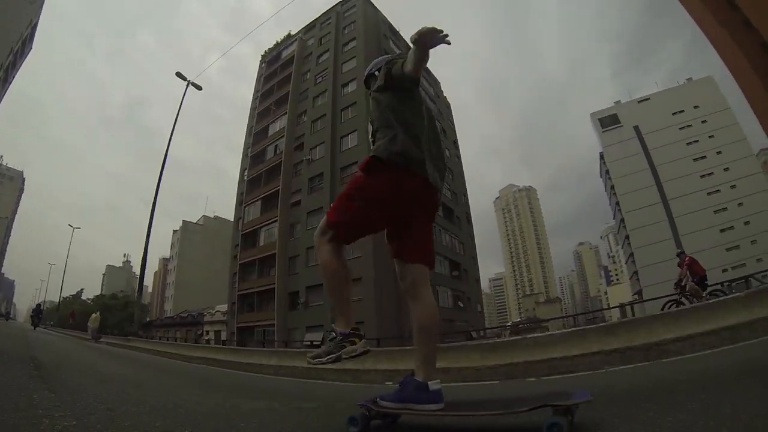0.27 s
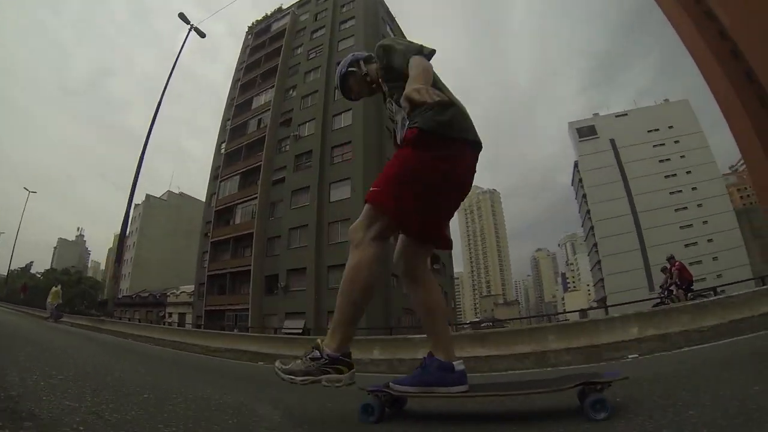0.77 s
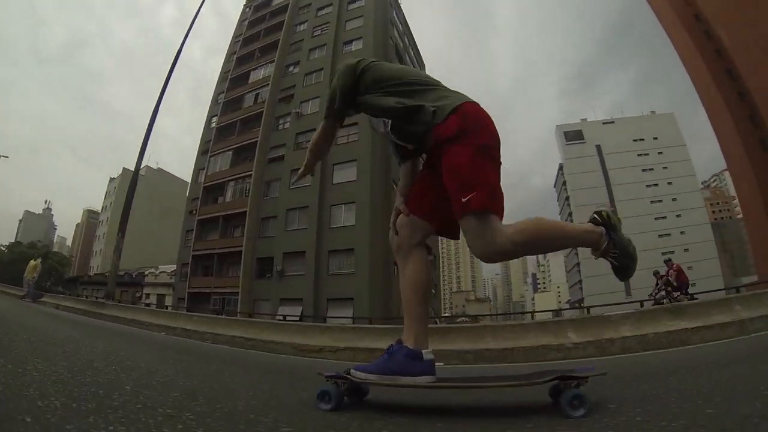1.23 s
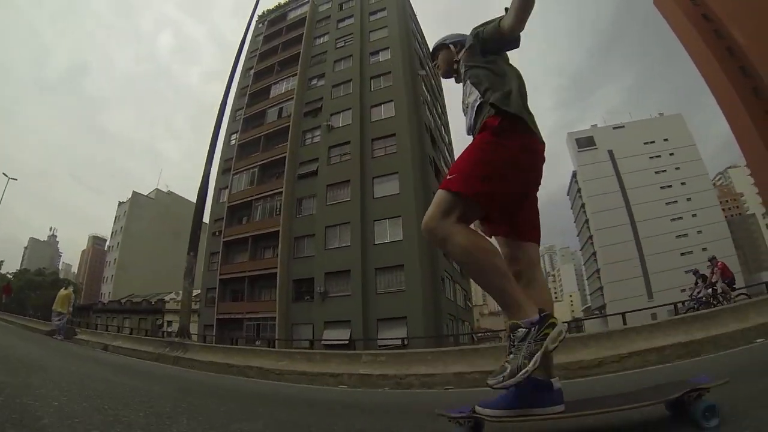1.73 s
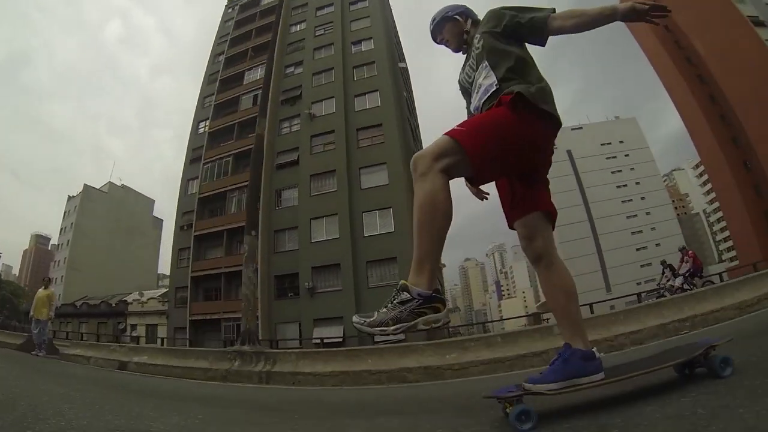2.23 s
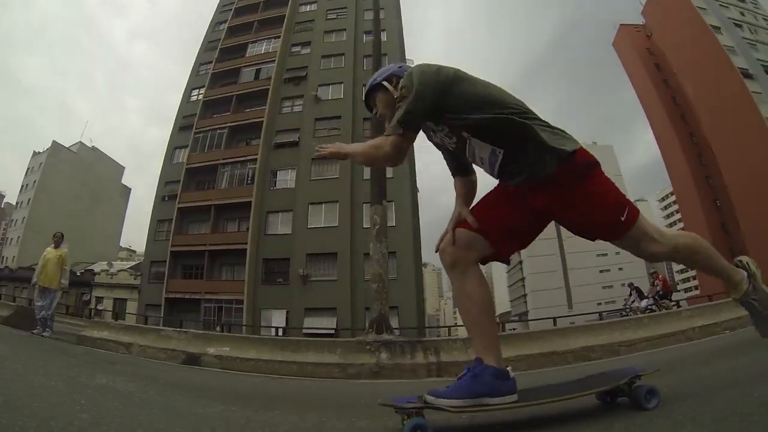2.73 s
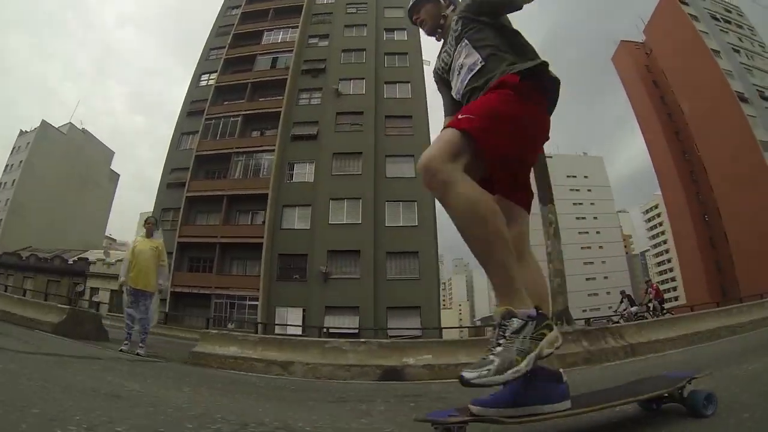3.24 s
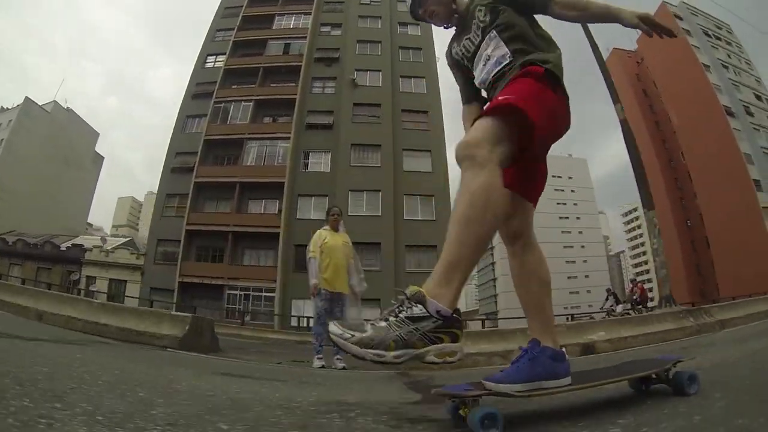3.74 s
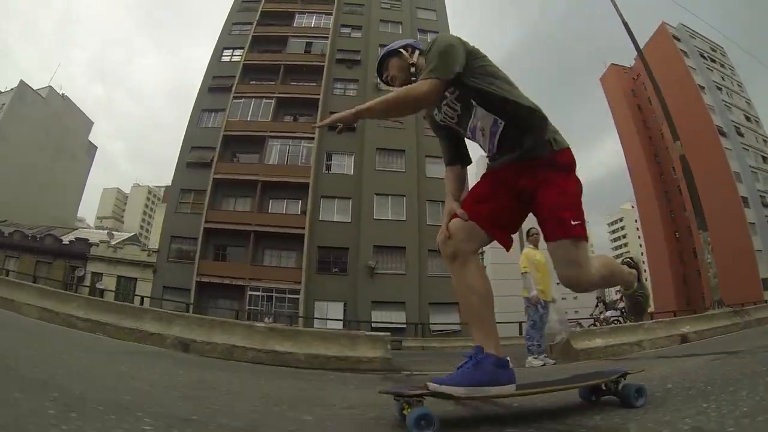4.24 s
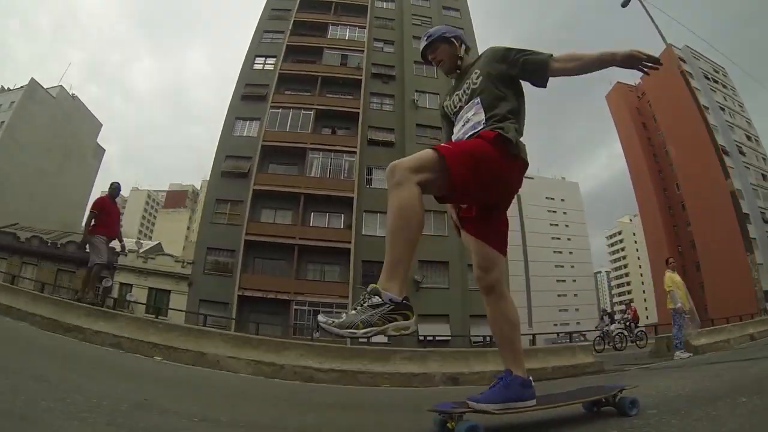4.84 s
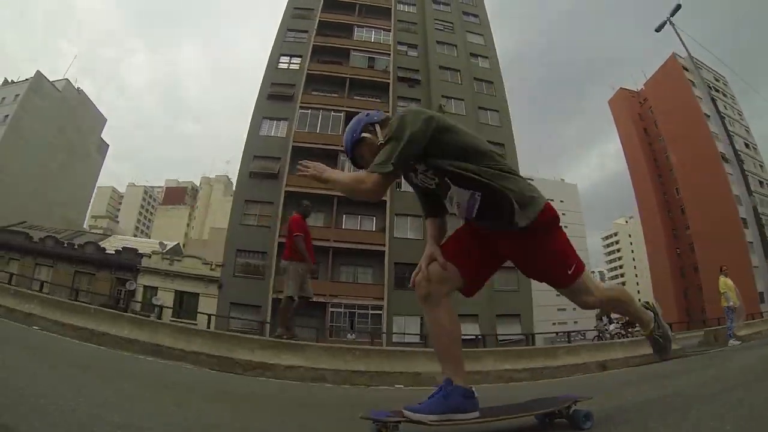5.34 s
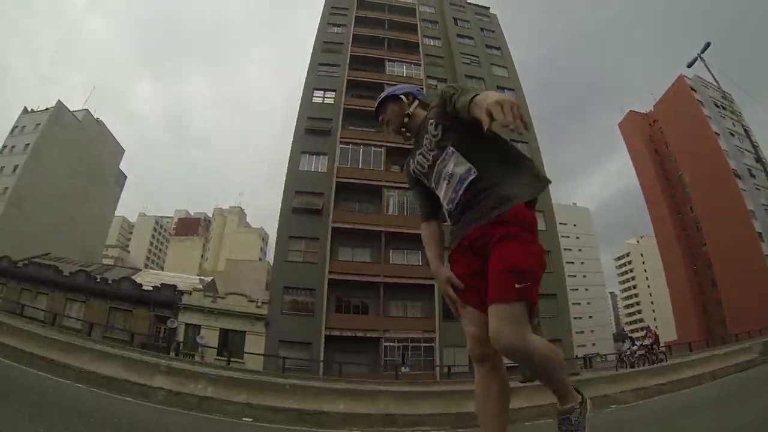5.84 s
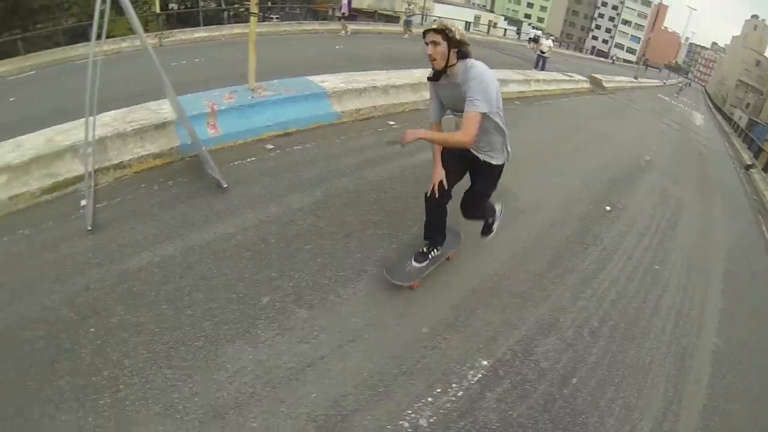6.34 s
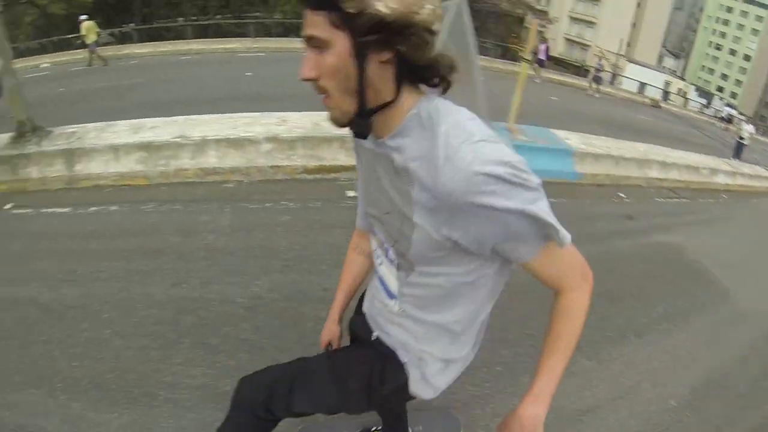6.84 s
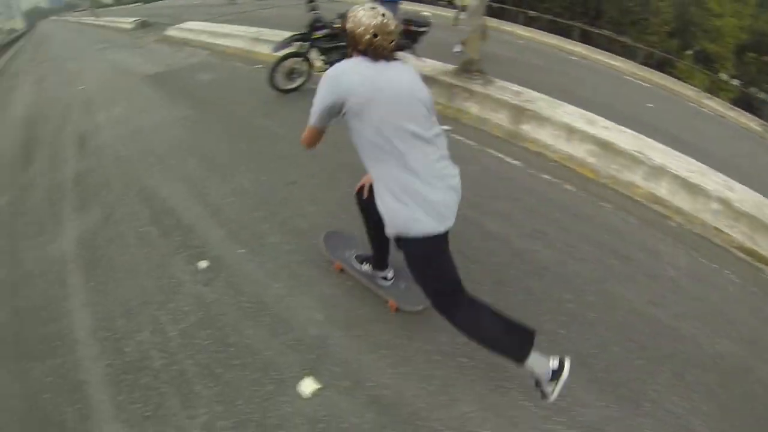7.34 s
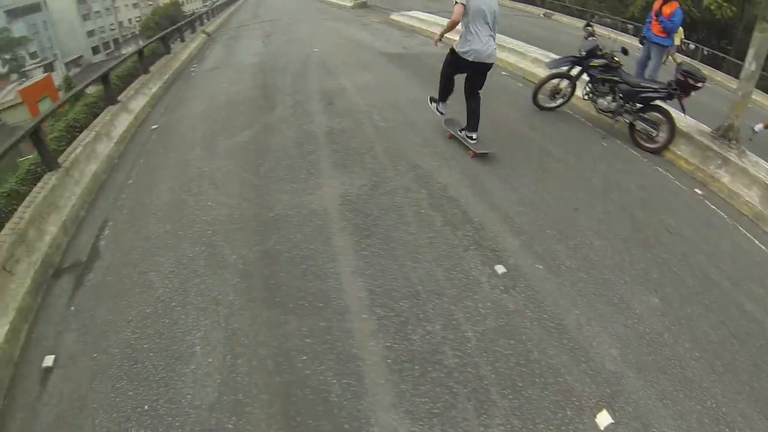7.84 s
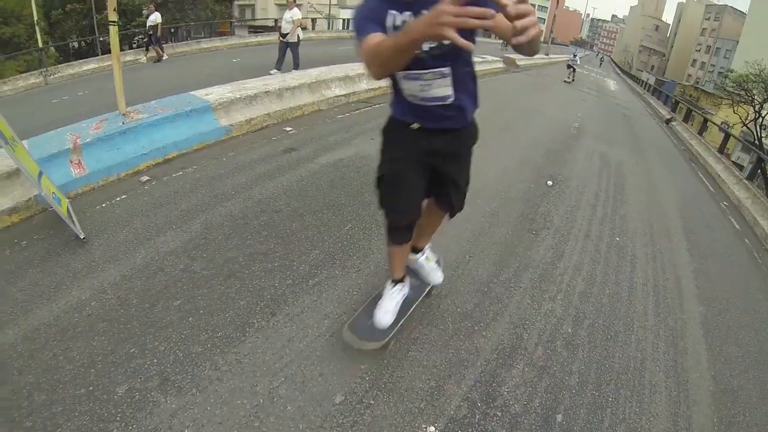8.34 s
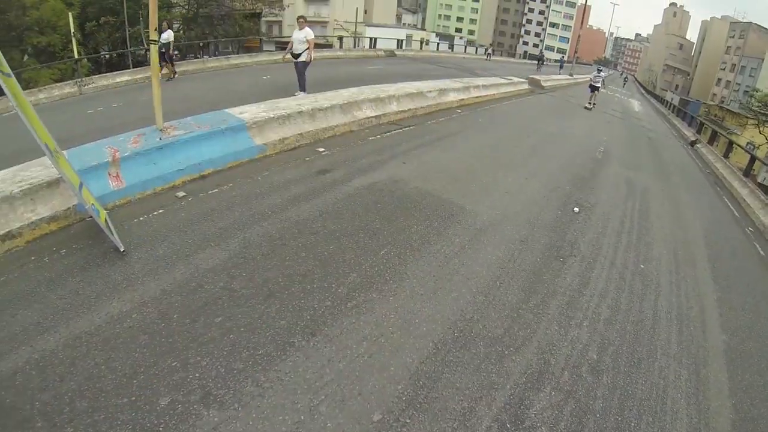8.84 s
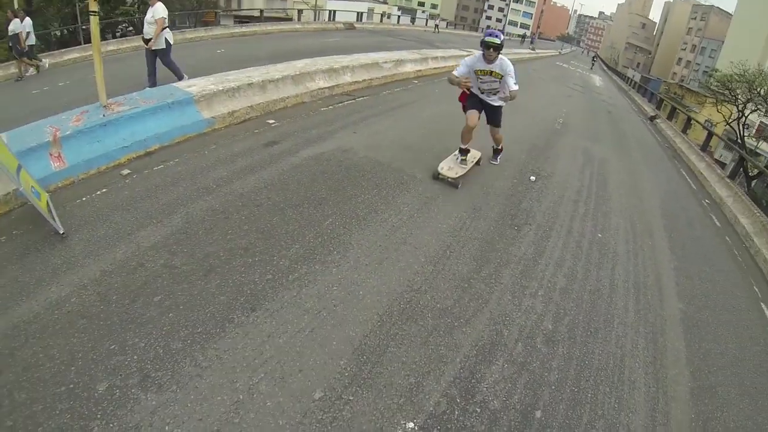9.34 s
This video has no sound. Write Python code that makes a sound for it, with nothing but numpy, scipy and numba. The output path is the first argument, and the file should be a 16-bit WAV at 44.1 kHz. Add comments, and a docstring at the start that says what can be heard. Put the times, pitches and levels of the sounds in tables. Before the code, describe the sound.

From 0 to about 6 seconds, a microphone in a sealed camera housing travels beside a longboard on rough city asphalt. The mounting pole gives a strong, low, wavering hum, swelling over bumps and briefly dipping, with a noticeable jolt near 0.6. Wind pushes in slow deep buffets. Muffled wheel grit hisses and the deck rumbles unevenly, with small stone ticks near 3.4 and 4.7. Around 6.3 the hum and near roll fade into a roadside view. Gusts flutter, and a board passes very close with heavy wooden knocks from 6.6 to 6.8, then rolls away around 7.2 with light rattles. Another dull swell comes at 8.1, and a knocking, rattling pass at 8.4 to 8.6. Wind drops to near quiet around 9, with small jolts, before a last soft roll at 9.4. Faint hiss and thin electronic whine persist throughout.

```python
"""At first we ride beside a longboard on rough asphalt, a small camera in a sealed housing on a pole: the
pole hums in three wavering bending modes, wheel grit hisses through the housing, wind buffets it.
From about 6 s a cross-fade leads to the roadside, where gusts flutter and the wind dies down while other
boards roll past as swells of duller noise and droning decks, and knock over cracks as decaying modes.
The camera's own faint hiss and whines, made of filtered noise, last throughout."""
import sys
import numpy as np
from scipy import signal
from scipy.fft import rfft, irfft, next_fast_len
from scipy.io import wavfile
from scipy.ndimage import uniform_filter1d
from numba import njit

SR = 44100
rng = np.random.default_rng(int(sys.argv[2]) if len(sys.argv) > 2 else 0)


def persist_wave(psi):
    """Save psi, clipped to +-1, as 16-bit WAV."""
    counts = np.round(np.clip(psi, -1, 1) * 32767).astype(np.int16)
    wavfile.write(sys.argv[1], SR, np.atleast_2d(counts).T)


N = 423345
T = np.arange(N) / SR
HZ = np.maximum(np.fft.rfftfreq(next_fast_len(N), 1 / SR), 1)  # bins of every filter, kept above 0 for logs

# Spectrum of the camera's own hiss: (frequency [Hz], level [dB per Hz])
HISS_SPECTRUM = [(150, -5), (500, -21.5), (1000, -21.5), (2500, -24), (3500, -33), (4400, -37.5),
                 (5600, -31.5), (7900, -41), (8600, -36), (10000, -38.5), (12000, -43), (16000, -47)]
# Thin whines of the camera's electronics: (frequency [Hz], width [Hz], level [dB])
WHINES = [(5040, 170, 0), (8640, 300, -11), (9900, 200, -13)]
HISS_DB, WHINE_DB = -56.5, -73.5

# First bending mode of the pole, bent by the grip: (time [s], pitch [Hz], level [dB])
POLE_LOW = [(0.0, 54.6, -27.5), (0.4, 53.76, -22.5), (0.59, 65.9, -18.5), (0.83, 67.64, -16.5),
            (0.96, 63.3, -14.5), (1.52, 66.45, -17.5), (2.09, 66.9, -21.5), (2.33, 60.63, -12.5),
            (2.44, 67.9, -17.5), (2.76, 62.9, -16), (3.03, 73.17, -17), (3.22, 70.2, -15),
            (3.4, 73.82, -15), (4.0, 71.8, -24), (4.1, 79.34, -21), (4.7, 70.9, -15), (4.87, 70.36, -18.5),
            (5.02, 60.43, -20.5), (5.18, 59.16, -16.5), (5.39, 71.84, -17.5), (5.53, 65.06, -19.5),
            (6.14, 63.6, -22.5), (6.36, 66.8, -18), (6.45, 55.3, -23), (6.6, 59.5, -34)]
# Brief changes of the low hum, nearly all dips: (time [s], depth [dB], half length [s])
LULLS = [(0.435, 21, 0.032), (0.662, 24, 0.03), (0.767, 17, 0.039), (0.988, 15.5, 0.044),
         (2.273, 13.5, 0.063), (2.463, 16, 0.025), (2.68, 16, 0.039), (3.002, 11, 0.019), (3.46, 17, 0.05),
         (3.851, 4.5, 0.13), (4.19, -0.5, 0.039), (4.562, 19, 0.042), (5.037, 5, 0.037), (5.219, 8, 0.029),
         (5.6, 2, 0.075), (5.841, 8, 0.038), (6.198, 13, 0.059), (6.381, 12, 0.024)]
# Road bumps that set the upper modes swinging:
# (time [s], second mode pitch [Hz], second mode peak [dB], third mode peak [dB])
BUMPS = [(0.12, 101.1, -31, -43), (0.319, 97, -29.5, -46), (0.588, 107.1, -28, -39),
         (0.74, 102.1, -39, -40.5), (1.08, 98.6, -32.5, -42), (1.32, 106.2, -30, -52),
         (1.45, 101.1, -24, -44), (1.65, 103.2, -25.5, -46.5), (1.87, 112.3, -29.5, -38),
         (2.15, 94.9, -29.5, -45), (2.35, 113.8, -29, -37.5), (2.55, 105.9, -21.5, -37.5),
         (2.77, 96.47, -26, -52), (3.098, 109.2, -23.5, -56), (3.29, 106.4, -33, -56),
         (3.55, 104.3, -25, -44.5), (3.7, 103.7, -25, -54), (3.94, 106, -22, -50), (4.07, 115.2, -25, -48),
         (4.3, 108.9, -27, -43), (4.61, 103, -24.5, -48), (4.91, 101.5, -24, -49),
         (5.181, 102.1, -22.5, -43.5), (5.38, 105.2, -24.5, -43.5), (5.72, 97.05, -22.5, -41.5),
         (5.95, 95, -32.5, -40), (6.09, 96, -34.5, -61), (6.27, 100.8, -22.5, -51)]
# Random shaking around the second mode: (frequency [Hz], width [Hz], level [dB])
POLE_SHAKE = [(100.6, 23.8, 1.5), (120, 7.6, -13), (142, 122, -21.5)]
# Jolts of the pole over cracks: (time [s], peak [dB])
JOLTS = [(0.614, -20), (1.014, -42), (1.479, -33), (2.418, -34), (3.044, -33), (3.598, -35), (4.149, -39),
         (4.709, -31), (8.74, -31.5), (9.017, -34), (9.2, -47), (9.29, -47)]
# Modes rung by a jolt: (frequency [Hz], level [dB], 60 dB decay time [s])
JOLT_MODES = [(168, 0, 0.18), (240, 1.5, 0.088), (323, 5, 0.085), (466, -2, 0.072), (750, -8.5, 0.04)]
BUMP_RISE_S, BUMP_FALL_S = 0.083, 0.084
MID_REST_DB, HIGH_REST_DB = -39, -56  # second and third mode between bumps
SHAKE_DB = -5.5  # relative to the second mode
LOW_SHAKE_HZ, LOW_SHAKE_WIDTH_HZ = 71.1, 25.6
LOW_SHAKE_DB = -10  # relative to the first mode
POLE_HIGH_HZ, POLE_HIGH_WIDTH_HZ = 185.7, 13  # third mode

# Wind buffets on the housing: (time [s], level [dB])
WIND = [(0.0, -16.5), (0.45, -17), (1.15, -22), (1.3, -27), (1.76, -21), (1.9, -18), (2.35, -18),
        (2.78, -25.5), (3.0, -30), (3.69, -21.5), (4.84, -19.5), (6.0, -21), (7.1, -19.5), (7.75, -19),
        (7.9, -23), (8.6, -29.5), (9.6, -25)]
# Spectrum of the slow buffets: (frequency [Hz], level [dB per Hz])
BUFFET = [(12, -2), (20, 14.5), (27, -11), (36, 0.5), (46, 2.5), (60, -16.5), (90, -65)]
# Steady flutter at the roadside: (time [s], level [dB])
FLUTTER_LEVEL = [(6.2, -24), (7.0, -28.5), (7.75, -26), (7.95, -28), (8.3, -34.5), (8.65, -38.5),
                 (9.0, -43.5), (9.6, -30)]
# Spectrum of flutter and gusts: (frequency [Hz], level [dB per Hz])
FLUTTER = [(38, -7), (52, 9.5), (70, -1), (83, -3), (102, 0), (125, -14.5), (150, -28.5), (180, -29),
           (202, -13.5), (225, -30.5), (300, -31)]
# Gusts that strike the housing: (time [s], peak [dB])
GUSTS = [(6.3, -22), (6.44, -22), (6.58, -24), (6.83, -15.5), (7.24, -38), (7.451, -18.5), (7.7, -22),
         (8.74, -30), (9.03, -31.5), (9.2, -38), (9.421, -31)]
BUFFET_WAVER_DB = 1.5
GUST_RISE_S, GUST_FALL_S = 0.0085, 0.021

# The board alongside, over rougher and smoother stretches: (time [s], grit level [dB])
ROLL = [(0.0, -35), (0.15, -37), (0.32, -37.5), (0.36, -42.5), (0.41, -38.5), (0.603, -38.5), (0.61, -47.5),
        (0.67, -42), (0.78, -40.5), (0.9, -45.5), (1.07, -42), (1.31, -45), (1.43, -37.5), (1.5, -44.5),
        (1.86, -42), (1.89, -49), (2.2, -38), (2.44, -45), (2.5, -41.5), (2.64, -49.5), (2.74, -41.5),
        (2.85, -51.5), (3.03, -43), (3.42, -45), (3.51, -38.5), (3.65, -42.5), (3.87, -40), (3.95, -46),
        (4.1, -43), (4.66, -43), (4.76, -46), (4.9, -41.5), (5.24, -41.5), (5.32, -44), (5.5, -41.5),
        (6.1, -41.5), (6.38, -49.5), (6.52, -50), (6.75, -65)]
# Resonances of the housing: (frequency [Hz], width [Hz], level [dB])
HOUSING = [(1250, 110, -12), (1350, 90, -4), (1450, 110, 1.5), (1555, 110, -4), (1670, 80, -5),
           (1820, 130, -5), (2110, 200, -12), (2300, 300, -10.5), (2750, 300, -21), (3010, 150, -13),
           (3170, 160, -15), (3150, 600, -14), (3400, 170, -17), (3980, 170, -14.5), (4230, 400, -23),
           (4710, 100, -18), (5070, 280, -20), (5440, 340, -22), (6350, 300, -30), (6760, 420, -24.5),
           (7540, 910, -36), (9400, 1300, -38)]
# Broad response under the housing resonances: (frequency [Hz], level [dB])
NEAR_BED = [(600, -18), (1200, -15), (2600, -30), (4400, -23), (6100, -31), (8300, -43), (11000, -41),
            (15000, -60)]
# Spectrum of the near deck's rumble: (frequency [Hz], level [dB per Hz])
DECK = [(100, -6), (140, 8.5), (220, -2), (340, -1), (480, -5), (620, -10.5), (850, -11.5), (1100, -17.5),
        (1500, -23), (2500, -57.5)]
# Single stones ticking under the wheels: (time [s], level [dB])
TICKS = [(0.94, -39), (1.164, -43), (2.4185, -47), (2.767, -43.5), (2.893, -42.5), (3.36, -38),
         (3.5095, -49), (4.6585, -35), (5.175, -43), (5.8233, -42.5)]
# Response that colours stone ticks and knock clicks: (frequency [Hz], level [dB])
CLICK_HIGH = [(1500, -22.5), (2200, 9), (4800, -4), (5400, -19.5), (8000, -36), (11000, -45.5)]
DECK_DB = -46.5  # rumble level at the median grit level
DECK_FOLLOWS = 0.34  # dB of rumble for each dB of grit

# Time span of the roadside, one row for each end: (time [s],)
ROADSIDE_SPAN = [(6.3,), (9.6,)]
# Swells of boards rolling past: (loudest moment [s], approach [s], leaving [s], grit level [dB],
# deck drone level [dB], drone centre [Hz], rumble level [dB])
PASSES = [(6.58, 0.07, 0.098, -58, -42, 460, -43), (6.73, 0.11, 0.082, -51.5, -39.5, 517, -42),
          (6.9, 0.06, 0.19, -58, -41.5, 575, -46), (7.22, 0.2, 0.14, -48, -47, 554, -41.5),
          (8.07, 0.038, 0.18, -47, -73, 463, -56), (8.55, 0.16, 0.16, -47, -48.5, 593, -42.5),
          (9.4, 0.047, 0.17, -49, -63, 480, -61)]
# Resonances of the roadside grit: (frequency [Hz], width [Hz], level [dB])
ROADSIDE = [(736, 140, -3), (1270, 200, -4), (1470, 235, 3.5), (1645, 130, -5), (1990, 700, -13)]
# Broad response under the roadside resonances: (frequency [Hz], level [dB])
FAR_BED = [(300, -16.5), (1000, -22), (2600, -30), (4200, -39), (7000, -36), (15000, -60)]
# Spectrum of the passing rumble: (frequency [Hz], level [dB per Hz])
RUMBLE = [(120, -24), (200, 2), (350, 6.5), (600, -5), (850, -3.5), (1100, -6), (2500, -42)]
# Thin swish of bearings: (time [s], level [dB])
SWISH = [(6.3, -72), (6.6, -71.5), (7.1, -65.5), (7.35, -67.5), (7.75, -60.5), (8.1, -66.5), (8.5, -66.5),
         (8.6, -67), (8.72, -61), (9.0, -69), (9.3, -70), (9.6, -65)]
# Passing decks knocking over cracks:
# (time [s], wood peak [dB], rattle peak [dB], rattle pitch [factor], high click level [dB])
KNOCKS = [(6.569, -14, -43, 1, -60), (6.587, -17, -39, 1.1, -60), (6.61, -24, -45, 1, -65),
          (6.652, -19, -42, 1.05, -61), (6.692, -25, -52, 1, -70), (6.748, -26, -52, 1, -70),
          (6.779, -28, -54, 1, -70), (6.814, -11, -22, 1.15, -38), (7.098, -53, -34, 1.05, -49),
          (7.118, -59, -40, 1, -54), (7.172, -50, -35, 1, -66), (7.209, -50, -31, 1, -66),
          (7.242, -50, -35, 1, -66), (7.293, -50, -36, 1, -66), (7.387, -44, -41, 1.2, -58),
          (7.77, -55, -39, 1.05, -68), (7.814, -48, -37, 1, -66), (7.836, -46, -39, 1, -66),
          (8.092, -48, -37, 1.05, -66), (8.132, -55, -39, 1.1, -54), (8.178, -50, -33, 1.03, -62),
          (8.287, -46, -38, 1, -65), (8.336, -38, -40, 1, -60), (8.404, -28, -36, 1.03, -57),
          (8.45, -48, -34, 1, -68), (8.459, -48, -33, 1, -68), (8.506, -30, -29, 1, -47),
          (8.576, -25, -26, .98, -62), (8.588, -45, -28, 1, -68), (8.652, -40, -37, 1.1, -60),
          (8.678, -48, -36, 1.03, -60), (9.075, -48, -35, 1, -72)]
# Wooden deck modes: (frequency [Hz], level [dB], 60 dB decay time [s])
KNOCK_MODES = [(200, -6, .17), (395, -5, .06), (475, 0, .065), (600, -5, .045), (790, -6, .03),
               (1050, -9, .02)]
# Rattle of trucks and housing: (frequency [Hz], level [dB], 60 dB decay time [s])
RATTLE_MODES = [(1260, -14, .03), (1430, 0, .06), (1620, -11, .035), (1850, -14, .025)]
# Thin bright snaps near the camera: (time [s], level [dB])
SNAPS = [(6.465, -51.5), (7.131, -54), (7.387, -43), (7.39, -46), (7.429, -56), (7.463, -52)]
# Response that colours the snaps: (frequency [Hz], level [dB])
SNAP = [(1500, -11), (2000, 3.5), (4500, -3.5), (8000, -14.5), (12500, -17)]
FALLOFF = 2.04  # power of distance
FAR_GRIT_DB, FAR_DRONE_DB, FAR_RUMBLE_DB = -52.5, -79, -57.5  # boards far down the road
SWISH_HZ, SWISH_WIDTH_HZ = 3170, 1080

# Treble response of the microphone: (frequency [Hz], level [dB])
MIC_TOP = [(1, 0), (10500, 0), (12000, -4), (13500, -12), (15000, -22), (22050, -22)]
TOP_HZ = 15000  # upper edge of the pass band


def undb(db):
    """Decibels to gain."""
    return 10 ** (np.asarray(db) / 20)


def unit(x):
    """Scale to rms 1."""
    return x / np.sqrt(np.mean(x ** 2))


def read(table):
    """Columns of a timed table, interpolated at every sample."""
    s, *columns = np.transpose(table)
    return [np.interp(T, s, column) for column in columns]


def fade(table, inn=0.01, out=0.2):
    """Gain 1 inside a table's time span, with ramps [s] at ends that are not those of the whole sound."""
    start, end = table[0][0], table[-1][0]
    opening = np.clip((T - start) / inn + (start <= 0), 0, 1)
    closing = np.clip((end - T) / out + (end > T[-1] - 0.1), 0, 1)
    return opening * closing


def hump(at, rise_s, fall_s, shape):
    """Envelope that is 1 at a moment, with its own time scale before and after."""
    return shape(np.abs(T - at) / np.where(T < at, rise_s, fall_s))


def bell(u):
    """Gaussian shape for humps."""
    return np.exp(-u ** 2)


def tilt(points):
    """Frequency response through (Hz, dB) points, -90 dB outside them."""
    hz, db = np.transpose(points)
    return undb(np.interp(np.log(HZ), np.log(hz), db, left=-90, right=-90))


def modes(rows, bed=0):
    """Causal, minimum-phase response of steep resonances over a broad bed; their powers add."""
    power = sum(undb(2 * db) / (1 + ((HZ ** 2 - hz ** 2) / (HZ * width)) ** 2) ** 2
                for hz, width, db in rows)
    cepstrum = irfft(np.log(power + bed ** 2 + 1e-12) / 2, next_fast_len(N))
    half = len(cepstrum) // 2
    cepstrum[1:half] *= 2  # fold the cepstrum onto its causal side
    cepstrum[half + 1:] = 0
    return np.exp(rfft(cepstrum))


def through(x, response):
    """Filter by a frequency response."""
    size = next_fast_len(N)
    return irfft(rfft(x, size) * response, size)[:N]


def walk(rate):
    """Random levels held 1 / rate s and slewed twice; spread near 1."""
    k = int(SR / rate)
    steps = np.repeat(rng.standard_normal(N // k + 1), k)
    return 1.322 * uniform_filter1d(uniform_filter1d(steps, k), k)[:N]


def grit(rate, stone_db, patchy_db):
    """Asphalt under a wheel: fine texture plus scattered stones (rate per s) of uneven size, in patches."""
    struck = rng.random(N) < rate / SR
    stones = struck * undb(stone_db) * rng.uniform(-1, 1, N) ** 3
    patches = undb(patchy_db * (walk(25) + 2.02 * walk(70)))
    return (rng.standard_normal(N) + stones) * patches


def blows(times, peaks_db, rows, pitches=1):
    """Each blow rings decaying modes, with levels and pitches a little different every time."""
    out, t = np.zeros(N + SR), T[:SR // 3]
    onset = 1 - np.exp(-t / 0.00034)
    pitches = pitches * np.ones(len(times))
    varied = rng.standard_normal((len(times), 2 * len(rows)))
    for s, peak_db, pitch, vary in zip(times, peaks_db, pitches, varied):
        ring = np.zeros(len(t))
        for k, (hz, db, t60) in enumerate(rows):
            mode_hz = hz * pitch * (1 + 0.03 * vary[2 * k + 1])
            decay = np.exp(-np.log(1000) * t / t60)
            ring += undb(db + 2.0 * vary[2 * k]) * np.sin(2 * np.pi * mode_hz * t) * decay
        start = int(s * SR)
        out[start:start + len(t)] += undb(peak_db) * onset * ring / np.abs(ring).max()
    return out[:N]


def clicks(times, levels_db, decay_s, response):
    """Short decaying bursts of noise through a response scaled to rms gain 1."""
    length = 400  # samples
    burst = np.zeros(N + length)
    decay = np.exp(-T[:length] / decay_s)
    cracks = rng.standard_normal((len(times), length))
    for at, db, crack in zip(times, levels_db, cracks):
        start = int(at * SR)
        burst[start:start + length] += undb(db) * crack * decay
    return through(burst[:N], response / np.sqrt(np.mean(np.abs(response) ** 2)))


def camera():
    """The camera's own hiss is wavering broadband noise; its electronics whine as noise in narrow bands."""
    hiss = unit(through(rng.standard_normal(N) * undb(0.4 * walk(30)), tilt(HISS_SPECTRUM)))
    whine = unit(through(rng.standard_normal(N), modes(WHINES)))
    return undb(HISS_DB) * hiss + undb(WHINE_DB) * whine


def bending(hz, gain, waver_hz, waver_db, swell_db):
    """A mode kept swinging by the road: a sine whose pitch and size waver."""
    phase = 2 * np.pi * np.cumsum(hz + waver_hz * walk(16)) / SR
    return np.sqrt(2) * np.sin(phase) * gain * undb(waver_db * walk(20) + swell_db * walk(7.6))


def pole():
    """Two bending modes as sines amid random shaking, a third as narrow noise, and jolts over cracks."""
    shake = unit(through(rng.standard_normal(N), modes(POLE_SHAKE)))
    third = unit(through(rng.standard_normal(N), modes([(POLE_HIGH_HZ, POLE_HIGH_WIDTH_HZ, 0)])))
    low_shake = unit(through(rng.standard_normal(N), modes([(LOW_SHAKE_HZ, LOW_SHAKE_WIDTH_HZ, 0)])))

    low_hz, low_db = read(POLE_LOW)
    lull_db = sum(db * hump(s, half_s, half_s, bell) for s, db, half_s in LULLS)
    first_hum = bending(low_hz, undb(low_db - lull_db), waver_hz=1.826, waver_db=1.0, swell_db=0.72)

    at, mid_hz, mid_db, high_db = np.transpose(BUMPS)
    swing = np.array([hump(s, BUMP_RISE_S, BUMP_FALL_S, bell) for s in at])
    mid_gain = undb(mid_db) @ swing + undb(MID_REST_DB)
    high_gain = undb(high_db) @ swing + undb(HIGH_REST_DB)
    second_hum = bending(np.interp(T, at, mid_hz), mid_gain, waver_hz=3.5, waver_db=1.8, swell_db=0.06)

    hums = (first_hum + second_hum + shake * mid_gain * undb(SHAKE_DB) + third * high_gain
            + low_shake * undb(low_db + LOW_SHAKE_DB))
    s, peak_db = np.transpose(JOLTS)
    return hums * fade(POLE_LOW) + blows(s, peak_db, JOLT_MODES)


def wind():
    """Slow pressure buffets on the housing; at the roadside a faster flutter rides on them and gusts strike."""
    buffet = unit(through(rng.standard_normal(N), tilt(BUFFET)) * undb(BUFFET_WAVER_DB * walk(25)))
    flutter = unit(through(rng.standard_normal(N) * undb(2.0 * walk(23)), tilt(FLUTTER)))
    gusts = sum(undb(db) * hump(s, GUST_RISE_S, GUST_FALL_S, lambda u: np.exp(-u)) for s, db in GUSTS)
    buffet_gain = undb(read(WIND)[0])
    flutter_gain = undb(read(FLUTTER_LEVEL)[0]) * fade(FLUTTER_LEVEL, inn=0.17)
    return buffet_gain * buffet + (flutter_gain + gusts) * flutter


def board():
    """Near wheel grit through the housing, stones ticking; the deck rumbles more where the road is rougher."""
    grit_db, = read(ROLL)
    hiss = unit(through(grit(90.0, 22.0, 0.7), modes(HOUSING, tilt(NEAR_BED))))
    deck = unit(through(grit(37.0, 31.0, 1.32), tilt(DECK)))
    deck_db = DECK_DB + DECK_FOLLOWS * (grit_db - np.median(grit_db))
    rolling = undb(grit_db) * hiss + undb(deck_db) * deck
    s, tick_db = np.transpose(TICKS)
    return rolling * fade(ROLL, out=0.22) + clicks(s, tick_db, 0.0027, tilt(CLICK_HIGH))


@njit
def sweep(x, hz, q):
    """State-variable band-pass with a moving centre."""
    y, band, low = np.empty(len(x)), 0., 0.
    for i in range(len(x)):
        g = np.tan(np.pi * hz[i] / SR)
        v = (band + g * (x[i] - low)) / (1 + g * (g + 1 / q))
        band = 2 * v - band
        low = low + 2 * g * v
        y[i] = v / q
    return y


def passers():
    """Boards further off swell with distance: dull grit, droning deck, rumble, bearing swish, knocks, snaps."""
    at, rise_s, fall_s, grit_db, drone_db, centre_hz, rumble_db = np.transpose(PASSES)
    near = np.array([hump(*row, lambda u: (1 + u ** 2) ** -FALLOFF) for row in zip(at, rise_s, fall_s)])

    def gain(db, far_db):
        """Powers of the passing and far boards add."""
        return np.sqrt(undb(2 * db) @ near + undb(2 * far_db))

    drone_hz = centre_hz @ near / near.sum(axis=0)  # the nearest board weighs most
    hiss = unit(through(grit(25.0, 19.0, 1.12), modes(ROADSIDE, tilt(FAR_BED))))
    road = grit(120.0, 21.0, 0.79)  # drives both drone and rumble
    drone = unit(sweep(sweep(road, drone_hz, 2.5), drone_hz, 2.5))
    rumble = unit(through(road, tilt(RUMBLE)))
    swish = unit(through(grit(30.0, 22.0, 1.2), modes([(SWISH_HZ, SWISH_WIDTH_HZ, 0)])))
    rolling = (gain(grit_db, FAR_GRIT_DB) * hiss
               + gain(drone_db, FAR_DRONE_DB) * drone
               + gain(rumble_db, FAR_RUMBLE_DB) * rumble
               + undb(read(SWISH)[0]) * swish)

    s, wood_db, rattle_db, rattle_pitch, click_db = np.transpose(KNOCKS)
    knocks = (blows(s, wood_db, KNOCK_MODES)
              + blows(s, rattle_db, RATTLE_MODES, rattle_pitch)
              + clicks(s, click_db, 0.0036, tilt(CLICK_HIGH)))
    snap_s, snap_db = np.transpose(SNAPS)
    snaps = clicks(snap_s, snap_db, 0.0017, tilt(SNAP))
    return rolling * fade(ROADSIDE_SPAN, inn=0.1) + knocks + snaps


def scene():
    """Everything at the one microphone."""
    return (camera() + pole() + wind() + board() + passers())[None]


def record(dry):
    """The input stage rounds the loudest swings, the microphone dulls the treble and the top is cut."""
    rounded = np.tanh(1.23 * dry[0]) / 1.22
    dull = through(rounded, tilt(MIC_TOP))[None]
    top_cut = signal.ellip(8, 0.2, 70, TOP_HZ, fs=SR, output="sos")
    return signal.sosfilt(top_cut, dull)


dry = scene()
out = record(dry)
persist_wave(out)
```